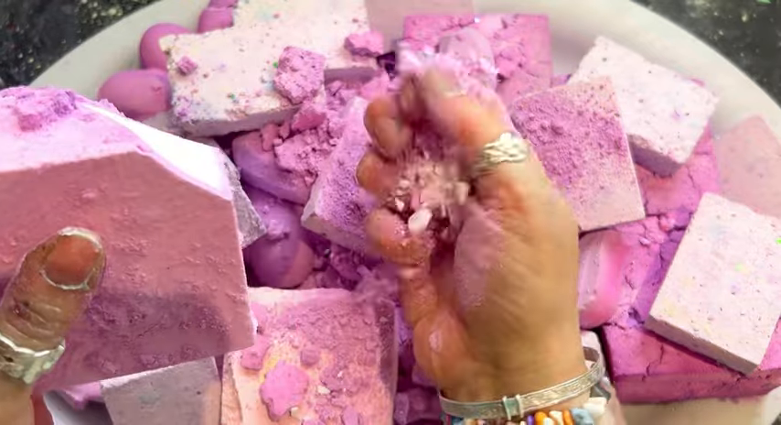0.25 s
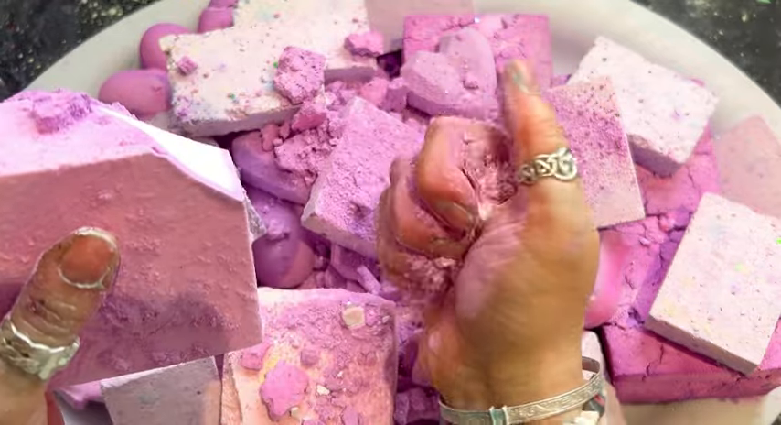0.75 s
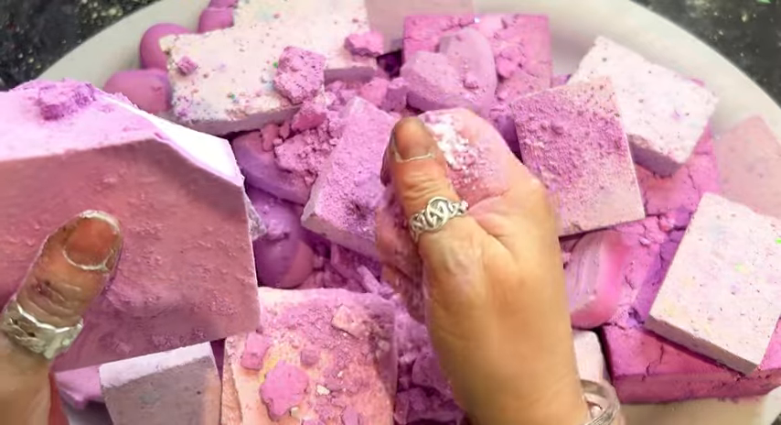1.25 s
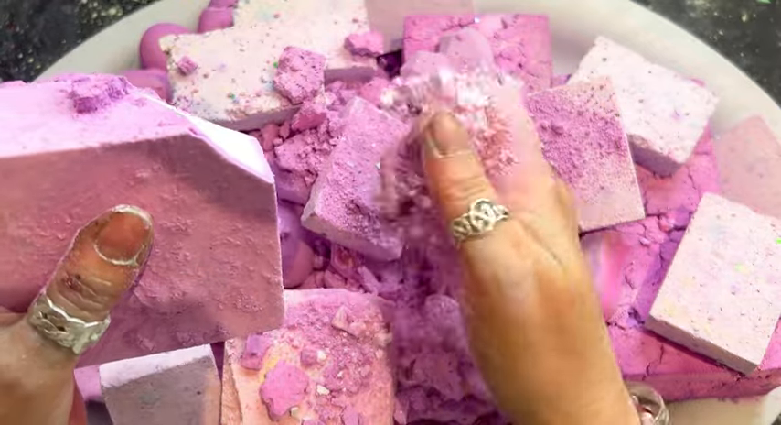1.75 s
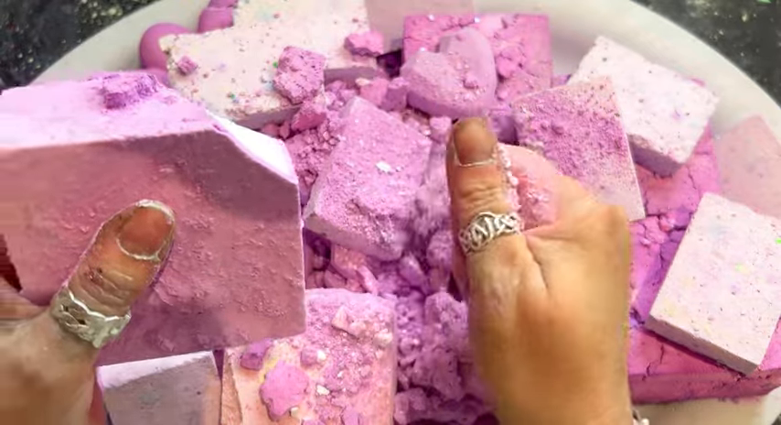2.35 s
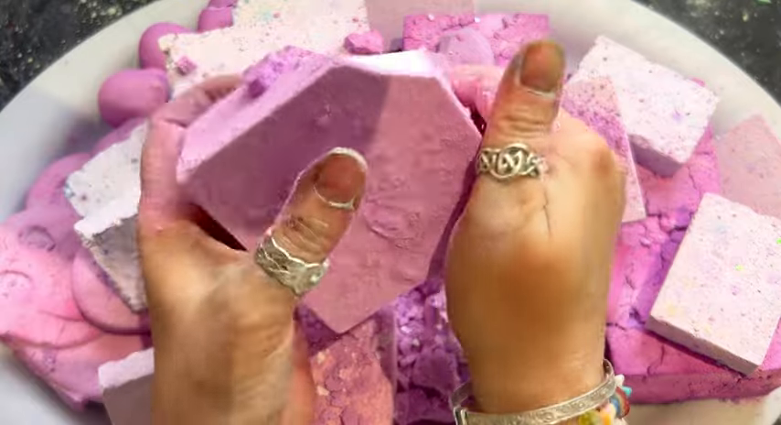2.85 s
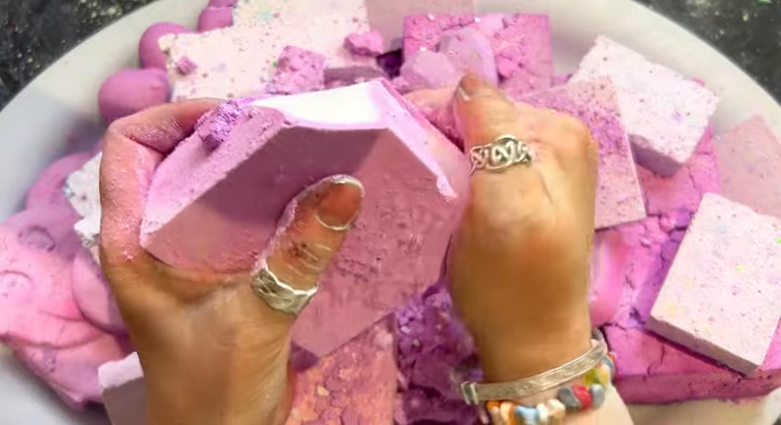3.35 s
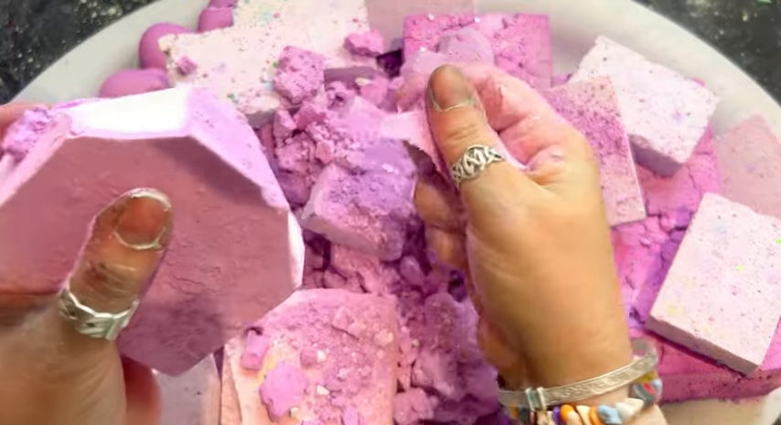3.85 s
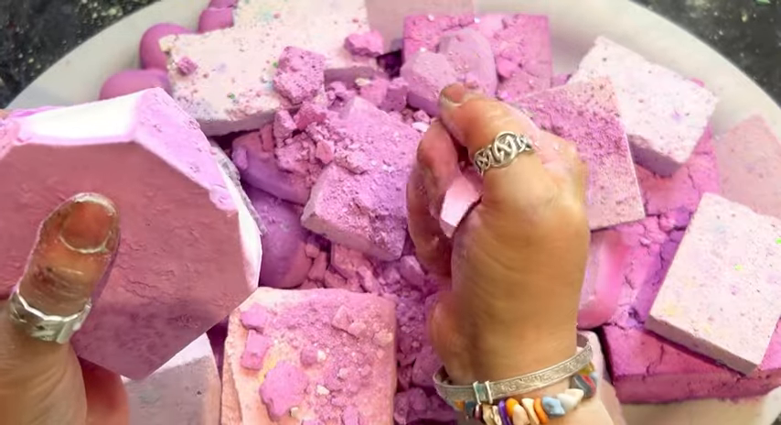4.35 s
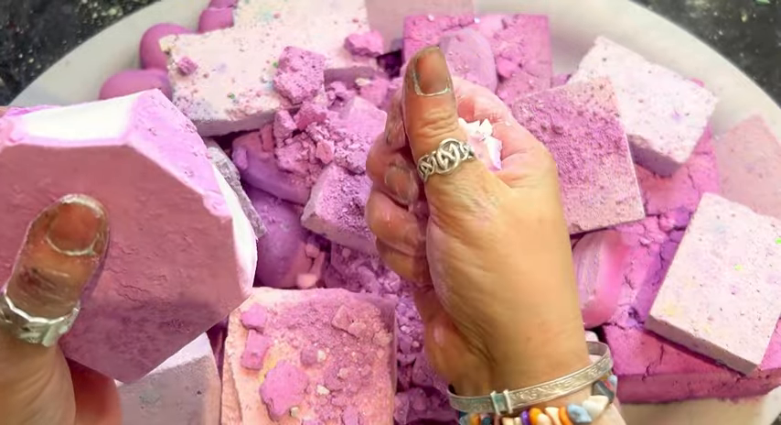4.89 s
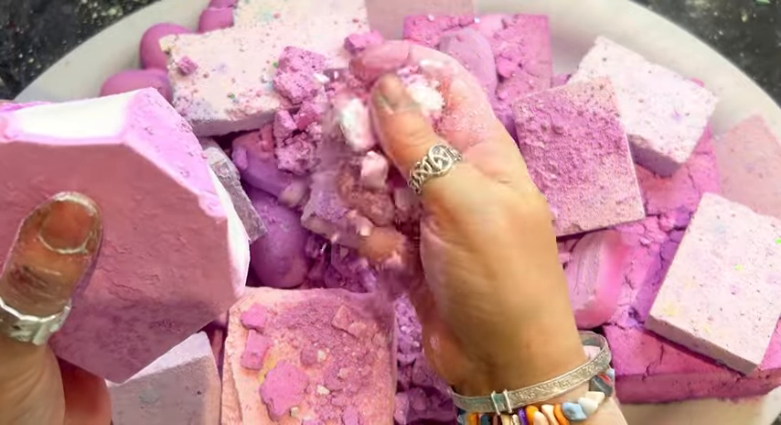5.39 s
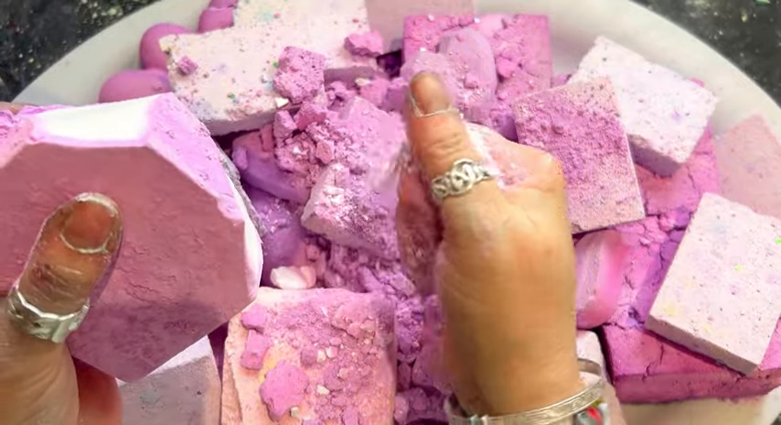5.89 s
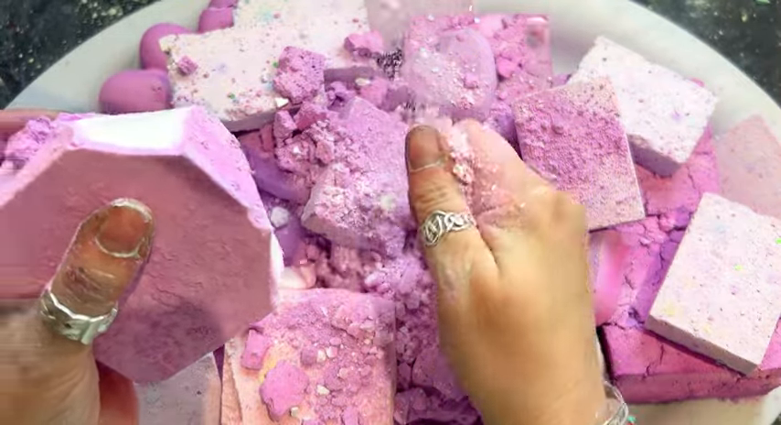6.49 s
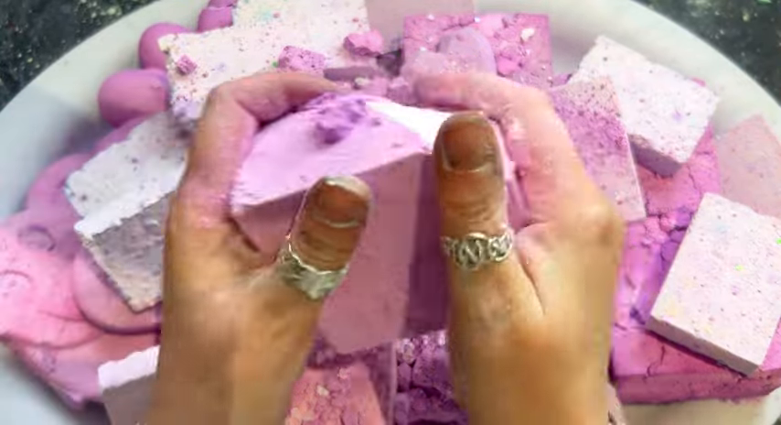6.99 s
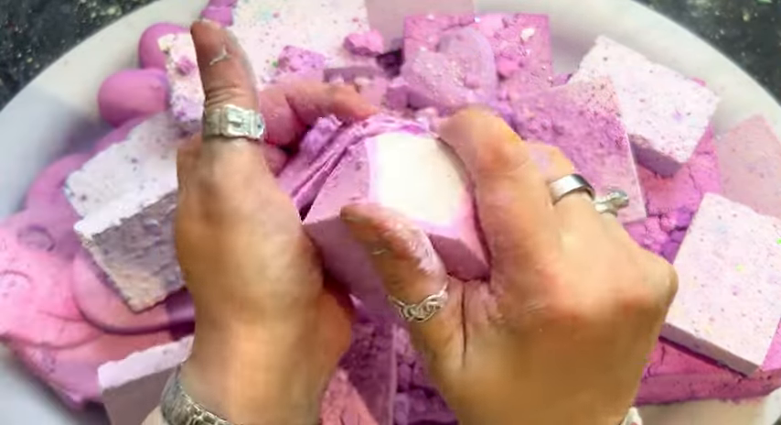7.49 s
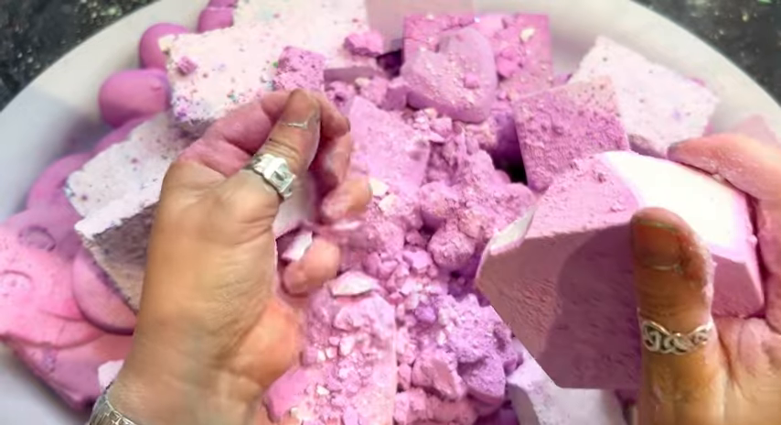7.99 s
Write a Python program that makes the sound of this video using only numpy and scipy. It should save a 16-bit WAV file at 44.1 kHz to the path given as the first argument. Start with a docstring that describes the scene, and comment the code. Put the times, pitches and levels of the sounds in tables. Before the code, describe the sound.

Hands crush dry chalk over a bowl, very close in stereo. Soft gritty squeezes and tiny crumb ticks come first, with sparse snaps; cracks crowd together around four seconds, then more breaks follow with powdery crumbling. A faint deep machine hum lies beneath, and a dull drone rises late before the loudest crack at the end.

```python
"""A hand squeezes and snaps dry chalk over a bowl, close to two microphone ports.
Throughout: a far machine's hum (wavering sines), dull building noise, trickling grit and powder (random tiny breaks).
From the start the fist kneads in bouts, crumbs tick (noise clicks) and sparse cracks (sharp pushes with rattle) run;
from 3 s chips and block knock now and then (ringing modes) and cracks crowd together near 4 s.
From 6.7 s a dull drone rises (band noise); the hum sinks, then partly returns; a loud crack falls near 8.1 s."""
import sys
import numpy as np
from scipy import signal
from scipy.fft import rfft, irfft
from scipy.io import wavfile

SR = 44100
rng = np.random.default_rng(int(sys.argv[2]) if len(sys.argv) > 2 else 0)


def store_pcm(level_fs):
    """Save levels as 16-bit WAV."""
    pcm = np.round(np.clip(level_fs, -1, 1) * 32767).astype(np.int16)
    wavfile.write(sys.argv[1], SR, np.atleast_2d(pcm).T)


def rack_gain(trim_db):
    """Turn a fader trim in dB into the linear factor to multiply a signal by."""
    fader = np.asarray(trim_db, float)
    return 10 ** (fader / 20)


N = 363384

# building noise, spectrum shape: (frequency [Hz], relative density [dB])
RUMBLE_SHAPE = [(20, -37), (45, 4), (75, 1.5), (150, -9.5), (350, -20), (600, -53), (1500, -64),
                (5000, -34)]
RUMBLE_DB = -55.5
# dull drone rising late: (time [s], level [dB])
DRONE_LEVEL = [(0, -69.5), (6.7, -70), (7.1, -60.5), (8.24, -57.5)]
# wavering machine tone: (time [s], frequency [Hz], rms level [dB])
HUM_TRACK = [(0, 35.12, -42.5), (4.65, 36.25, -44), (4.85, 37.2, -40.5), (5.05, 37.3, -48),
             (5.35, 35.2, -40.5), (5.6, 39.87, -47), (6.2, 36.15, -46), (7.3, 36.07, -58.5),
             (8.24, 35.87, -48)]
# steadier tones under it: (frequency [Hz], mean rms level [dB])
STEADY_TONES = [(68.5, -57), (144, -66.5), (81.1, -57), (60.2, -64)]
# chips on the bowl, block on the palm: (time [s], level [dB], mode [Hz], t60 [s])
KNOCKS = [(5.792, -37, 2573, .1), (6.588, -40, 1400, .06), (3.285, -31, 380, .05), (3.545, -39, 140, .12),
          (3.29, -38, 145, .15), (2.978, -44, 250, .06)]
# single crumbs snapping: (onset [s], level before overall gain [dB], brightest frequency [Hz])
CRUMB_TICKS = [(0.342, -41, 2450), (0.4269, -38.5, 2730), (0.5794, -36, 6750), (1.0722, -36, 6760),
               (1.2974, -37, 6500), (1.327, -29, 7500), (2.1296, -29, 6430), (2.5563, -39, 2300),
               (3.418, -42, 2880), (3.8581, -39, 2700), (3.8758, -41, 2630), (3.917, -25, 2440),
               (4.022, -31.5, 3700), (4.0498, -21, 3760), (4.1333, -37, 7900), (4.178, -21, 8000),
               (4.1955, -25.5, 6880), (4.2587, -38, 3710), (4.3312, -41, 2970), (4.3718, -34.5, 3300),
               (4.4245, -39, 1360), (4.5653, -45.5, 2630), (4.8514, -45, 7000), (4.8763, -23, 4500),
               (4.9511, -34.5, 2730), (5.0282, -28, 7300), (5.451, -40, 2860), (5.582, -43, 3700),
               (5.639, -36, 4620), (5.7904, -33, 2900), (6.497, -51, 2780), (6.5064, -38, 2424),
               (6.6378, -41, 1320), (6.6815, -42.5, 2510), (7.5582, -46.5, 2160)]
# bouts of the fist: (time of full strength [s], hold [s], grit before clumping [dB], powder re grit [dB])
KNEAD_BOUTS = [(0, 0.014, -47.5, -5), (0.1, 0.024, -55, -7), (0.365, 0.074, -54, -4.5),
               (0.54, 0.21, -60, -3.5), (0.952, 0.09, -65, 2), (1.02, 0.15, -59.5, -29),
               (1.48, 0.059, -58.5, -6), (1.83, 0.066, -55, -26), (2.02, 0.028, -66, -9),
               (2.394, 0.0093, -57.5, -1.5), (2.818, 0.047, -58.5, -6.5), (3.078, 0.023, -67, 4),
               (3.331, 0.012, -57.5, 16.5), (3.528, 0.32, -61.5, -5), (4.25, 0.11, -65, 8.5),
               (4.56, 0.014, -64, -10), (4.915, 0.28, -54.5, -3.5), (5.489, 0.12, -53, -7.5),
               (5.715, 0.2, -59, -12), (5.917, 0.023, -60, -1), (6.2, 0.024, -75.5, 9),
               (6.506, 0.015, -62, 0), (6.634, .18, -58, -2), (6.991, 0.19, -61.5, -0.5),
               (7.54, 0.21, -61.5, -0.5), (7.796, 0.068, -59, -8), (7.88, .07, -62.5, -2.5),
               (8.136, 0.11, -52.5, -16)]
GRIP_DB_PER_S, RELEASE_DB_PER_S = 300, 208
TRICKLE_GRIT_DB, TRICKLE_POWDER_DB = -66.5, -79.5
# cracks: (onset [s], level before overall gain [dB], thud re level [dB], sizzle re level [dB], piece pitch [Hz])
CRACK_EVENTS = [(0.3679, -32.5, -17, -1, 2750), (0.858, -43.5, -16, -8, 1900),
                (1.0765, -31, -21, -3.5, 3500), (1.1753, -39, -7.5, -8, 1360), (1.3077, -19, -15, -8, 2050),
                (1.5482, -33.5, -15, -4.5, 4360), (1.7966, -34.5, -14, -8, 3940),
                (2.1408, -18, -21, -7.5, 3280), (2.8887, -34, -4, -22, 1540), (3.065, -41, -7.5, -14, 1750),
                (3.1093, -36.5, -9.5, -3.5, 3200), (3.2832, -15.5, -9, -1.5, 2920),
                (3.3762, -29, -9.5, -10, 2980), (3.5551, -44.5, 1, -10, 1870),
                (3.7205, -36, -17, -19, 4060), (3.8918, -18, -23, -8, 4430), (3.907, -16.5, -15, -5, 2360),
                (3.9313, -17.5, -20, -9, 2750), (4.0363, -12.5, -13.5, -8.5, 2270),
                (4.157, -14.5, -23.5, -9, 2570), (4.8088, -16, -28, -2.5, 2680),
                (4.8578, -12.5, -18, -7.5, 2850), (5.0363, -18.5, -26, 3.5, 3340),
                (5.657, -17.5, -10.5, -11, 3480), (5.7641, -35.5, -2.5, -10, 2680),
                (6.084, -39, -29, 3, 1470), (6.117, -32, -34, -38, 4585), (6.3615, -24, -20, -11, 2505),
                (6.3934, -15.5, -18, -2.5, 4020), (6.5875, -34.5, -18, -10, 1380),
                (6.98, -50, 2, -11, 1760), (7.392, -21, -5.5, 4, 1400), (7.3978, -19.5, -5, -6, 2520),
                (7.4195, -24, -9.5, -4, 2750), (7.792, -31, -30, -14, 4640), (7.814, -35, -15, -18, 2500),
                (7.8392, -34, -5.5, -0.5, 2110), (8.011, -19.5, -8, -4, 2860),
                (8.0341, -26.5, -14, -8, 2980), (8.108, -26, -27, -13, 3040),
                (8.1324, -4.5, -19.5, -8.5, 2720), (8.2082, -31.5, -20, 10, 3440)]
# modes of the block in the hand: (frequency [Hz], relative level [dB], t60 [s])
BLOCK_MODES = [(140, -7, 0.14), (262.3, -10, 0.38), (416, 0, 0.11), (595, 31, 0.0032)]
CRUMBLE_FULL_DB, CRUMBLE_SHARE = -32, 0.69  # after a 0 dB crack; share of a crack's dB that crumbling follows
CRACK_GAIN_DB, TICK_GAIN_DB = 5.5, 7.5  # overall gain of all cracks, of all ticks
GRIT_LOW_HZ, POWDER_LOW_HZ, DUST_HZ, POWDER_TOP_HZ = 1190, 5400, 7500, 14900
# right port against left: (frequency [Hz], lag [half turns], likeness [0-1], right louder [dB])
PORT_PAIR = [(0, 0., .995, 0.), (250, -.06, .9, 2.), (800, 0., .6, 4.), (1400, 0., .93, 0.),
             (2500, .55, .8, 4.), (3600, .4, .55, 5.), (4700, .8, .55, 7.), (5500, 1, .96, 0),
             (10050, 3, .975, 0), (15100, 5, .97, 0), (17000, 5.2, .9, 0)]


def band(x, low_hz, high_hz, order=2):
    """Butterworth band-pass."""
    edges_hz = [low_hz, min(high_hz, .45 * SR)]
    return signal.sosfilt(signal.butter(order, edges_hz, "band", fs=SR, output="sos"), x)


def unit(x, by_peak=False):
    """Scale to rms 1 or to peak 1."""
    return x / (np.abs(x).max() if by_peak else np.sqrt(np.mean(x ** 2)))


def in_time(rows):
    """Columns of a curve, one value per sample."""
    time_s, *columns = np.transpose(rows)
    return [np.interp(np.arange(N) / SR, time_s, c) for c in columns]


def drift(knots_per_s):
    """Slow random curve: straight lines between normal knots of spread 1."""
    knots = rng.standard_normal(int(N / SR * 200) + 2)
    position = np.arange(N) / SR * np.clip(knots_per_s, .1, 199)
    return np.interp(position, np.arange(len(knots)), knots)


def ring(push, hz, t60_s):
    """Damped resonator: a unit click starts a sine of height 1."""
    radius, angle = rack_gain(-60 / (t60_s * SR)), 2 * np.pi * hz / SR
    poles = [1, -2 * radius * np.cos(angle), radius * radius]
    return signal.lfilter([0, np.sin(angle)], poles, push + 1e-18)


def add(out, sound, start_s):
    """Mix a sound in from start_s on."""
    i = round(start_s * SR)
    out[:, i:i + sound.shape[1]] += sound[:, :N - i]


def grains(shape, per_s, spread_db, over_db):
    """Tiny breaks at random moments, mostly small, a few large, over a steady bed of finer ones."""
    born = rng.random(shape[-1]) < per_s / SR
    height_db = spread_db * np.minimum(rng.exponential(1, shape[-1]), 3) + over_db
    swell = signal.lfilter([1], [1, -.96], rack_gain(height_db) * born)  # time constant under 1 ms
    return (1 + swell) * rng.standard_normal(shape)


def powder(force):
    """The bright part of a break; finer dust is weaker."""
    softened = signal.lfilter(*signal.butter(1, DUST_HZ, fs=SR), force)
    return band(softened, POWDER_LOW_HZ * .9, POWDER_TOP_HZ, order=3)


def rumble():
    """Dull building noise: noise shaped by a density curve, plus a band-noise drone."""
    hz = np.maximum(np.arange(N // 2 + 1) * SR / N, 1)
    at_hz, shape_db = np.transpose(RUMBLE_SHAPE)
    colour = rack_gain(np.interp(np.log(hz), np.log(at_hz), shape_db, left=-60, right=-60))
    noise = irfft(rfft(rng.standard_normal((2, N))) * colour, N)
    drone = unit(band(rng.standard_normal((2, N)), 103, 378))
    return rack_gain(RUMBLE_DB) * unit(noise) + rack_gain(in_time(DRONE_LEVEL)[0]) * drone


def hum():
    """Slow motor tone of wavering pitch and level, over steadier tones that drift in level and phase."""
    hz, level_db = in_time(HUM_TRACK)
    out = rack_gain(level_db) * np.sin(2 * np.pi * np.cumsum(hz) / SR)
    for tone_hz, tone_db in STEADY_TONES:
        gain = rack_gain(tone_db + 3.3 * drift(5.3))
        out = out + gain * np.sin(2 * np.pi * tone_hz * np.arange(N) / SR + 1.03 * drift(5.0))
    return np.sqrt(2) * out  # rms to peak


def knocks(scuff_s=0.003, partner_ratio=1.13, partner_db=-5):
    """A click and brief scuff set a mode ringing, and a shorter one just above it."""
    out, t = np.zeros((2, N)), np.arange(SR // 4) / SR
    for start_s, level_db, hz, t60_s in KNOCKS:
        scuff = (t == 0) + .06 * rng.standard_normal(len(t)) * np.exp(-t / scuff_s)
        mode = ring(scuff, hz, t60_s)
        partner = rack_gain(partner_db) * ring(scuff, hz * partner_ratio, t60_s / 2)
        add(out, rack_gain(level_db) * np.ones((2, 1)) * (mode + partner), start_s)
    return out


def ticks(rise_s=0.00033, snap_s=0.00036, rattle_db=-24, rattle_t60_s=0.18, broad=0.66):
    """A crumb gives one broad click, strongest near its own pitch, and a wisp of grit."""
    out, t = np.zeros((2, N)), np.arange(SR // 20) / SR
    envelope = np.exp(-t / snap_s) + rack_gain(rattle_db - 60 * t / rattle_t60_s)
    for start_s, level_db, hz in CRUMB_TICKS:
        push = rng.standard_normal((2, len(t))) * envelope
        push[:, 0] = 3  # the break itself
        click = band(push, hz / 1.51, hz * 1.13) + broad * band(push, 1170, 7300)
        add(out, rack_gain(TICK_GAIN_DB + level_db) * unit(click, True), start_s + rise_s)
    return out


def kneading():
    """Gains of grit and of powder: each bout swells, holds and dies over a steady trickle."""
    t = np.arange(N) / SR
    grit_power, powder_power = rack_gain(TRICKLE_GRIT_DB) ** 2, rack_gain(TRICKLE_POWDER_DB) ** 2
    for full_s, hold_s, grit_db, powder_db in KNEAD_BOUTS:
        grip_db = GRIP_DB_PER_S * np.maximum(full_s - t, 0)
        release_db = RELEASE_DB_PER_S * np.maximum(t - full_s - hold_s, 0)
        power = rack_gain(grit_db - grip_db - release_db) ** 2
        grit_power = grit_power + power
        powder_power = powder_power + power * rack_gain(powder_db) ** 2
    return np.sqrt(grit_power), np.sqrt(powder_power)


def grinding(sizes=12):
    """Grains break in clumps: crumbs of each size ring a few cycles at their pitch, fine powder hisses."""
    grit_gain, powder_gain = kneading()
    clumps = rack_gain(1.5 * drift(30) + 2.0 * drift(80))
    crumbs = np.zeros((2, N))
    for hz in np.geomspace(850, 5000, sizes):
        breaks = grains((2, N), per_s=16, spread_db=8.5, over_db=4.0)
        crumbs += np.sqrt(hz) * unit(ring(breaks, hz, 14 / hz))  # t60 of 14 cycles
    rain = grains((2, N), per_s=130, spread_db=2.5, over_db=4.0)
    grit = unit(crumbs) + .9 * unit(band(rain, GRIT_LOW_HZ, POWDER_LOW_HZ * 1.1))
    return clumps * (grit_gain * unit(grit) + powder_gain * unit(powder(rain)))


def cracks(rise_s=0.0007, snap_s=0.0003, echo_s=0.00242, echo_db=-15,
           rattle_db=-23, rattle_t60_s=0.033, crumble_t60_s=0.24, lead_db=-32):
    """A snap with its echo off the bowl, a short rattle and crumbling; two renderings of fine detail."""
    out, lead = np.zeros((2, N)), SR // 100
    t = (np.arange(SR // 4) - lead) / SR

    def fall(t60_s):
        return rack_gain(-60 * t / t60_s) * (t >= 0)

    def grit(x):
        return band(x, GRIT_LOW_HZ, POWDER_LOW_HZ * 1.396, order=3)

    def thud(x):
        return sum(rack_gain(db) * ring(x, hz, t60_s) for hz, db, t60_s in BLOCK_MODES)

    snap = np.exp(-np.abs(t) / snap_s) + rack_gain(echo_db) * np.exp(-np.abs(t - echo_s) / snap_s)
    lead_noise = rack_gain(lead_db + 2200 * t) * (t < 0)  # short noise lead-in, last 10 ms
    rattle = rack_gain(rattle_db) * fall(rattle_t60_s)
    for start_s, level_db, thud_db, sizzle_db, pitch_hz in CRACK_EVENTS:
        def body(x):
            return grit(x) + 2.1 * band(x, pitch_hz / 1.27, pitch_hz * 1.36)

        crumble_db = CRUMBLE_FULL_DB + (CRUMBLE_SHARE - 1) * level_db  # re the crack
        rough = grains((2, len(t)), per_s=120, spread_db=2.5, over_db=3.0)
        jolt = 4.77 * rng.choice([-1, 1], (2, 1)) * (t == 0)  # the break: one sharp push
        blow = jolt + rng.standard_normal((2, len(t))) * snap
        around = rattle + rack_gain(crumble_db) * fall(crumble_t60_s) + lead_noise
        for sharp, loose, part_db in ((body, grit, 0), (powder, powder, sizzle_db), (thud, thud, thud_db)):
            part = unit(sharp(blow), True) + around * unit(loose(rough))
            add(out, rack_gain(CRACK_GAIN_DB + level_db + part_db) * part, start_s + rise_s - lead / SR)
    return out


def ports(one, other):
    """Right port: the left's sound shifted in phase, mixed with the other rendering where likeness is low."""
    hz = np.arange(N // 2 + 1) * SR / N
    at_hz, *columns = np.transpose(PORT_PAIR)
    lag, alike, louder_db = [np.interp(hz, at_hz, c) for c in columns]
    alike = np.clip(alike, 0, 1)
    left = rfft(one)
    right = alike * left + np.sqrt(1 - alike ** 2) * rfft(other)
    right = right * np.exp(-1j * np.pi * lag) * rack_gain(louder_db / 2)
    return np.array([irfft(left * rack_gain(-louder_db / 2), N), irfft(right, N)])


def scene():
    """Chalk and building noise reach both ports; the hum is alike in both."""
    one, other = rumble() + knocks() + ticks() + grinding() + cracks()
    return ports(one, other) + hum()


def top_cut(x):
    """Nothing passes above the cut-off."""
    return signal.sosfilt(signal.butter(12, 17010, fs=SR, output="sos"), x)


def record(dry):
    """Turn the finished mix into the output."""
    return top_cut(dry)


dry = scene()
out = record(dry)
store_pcm(out)
```